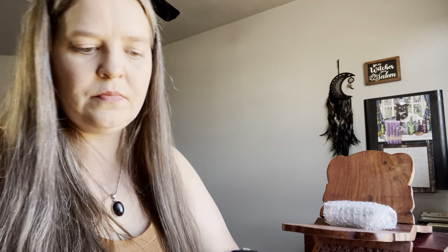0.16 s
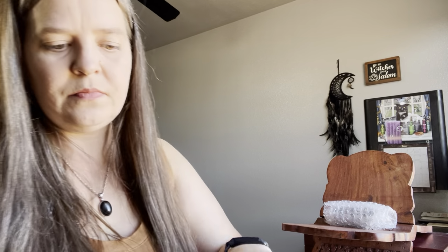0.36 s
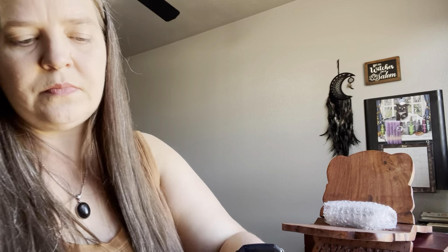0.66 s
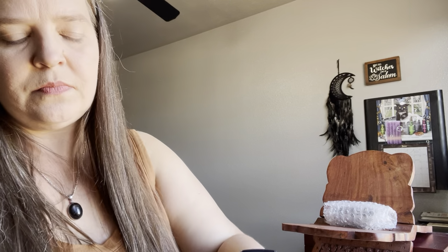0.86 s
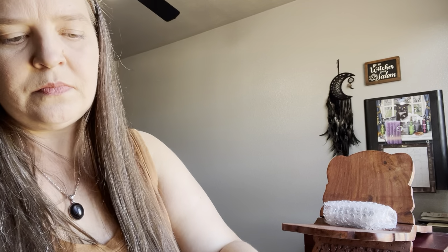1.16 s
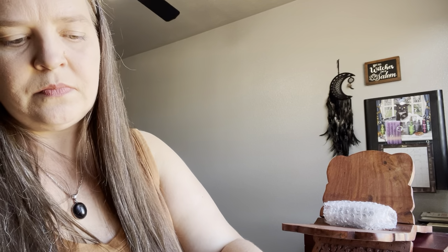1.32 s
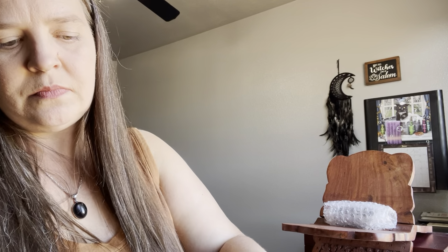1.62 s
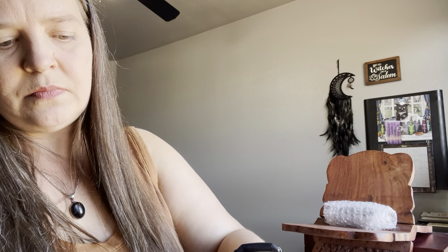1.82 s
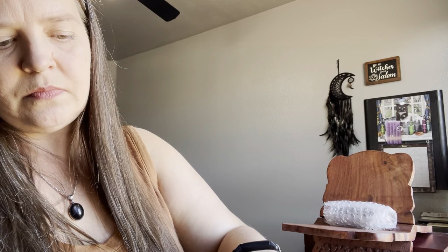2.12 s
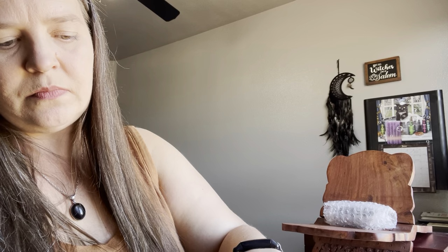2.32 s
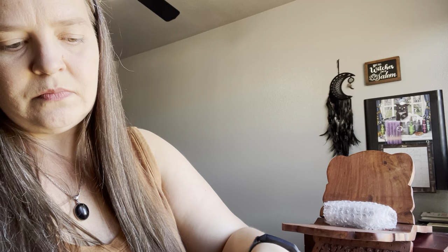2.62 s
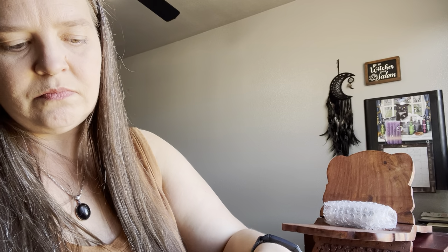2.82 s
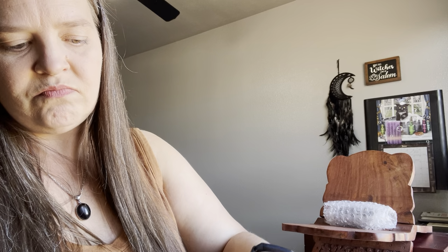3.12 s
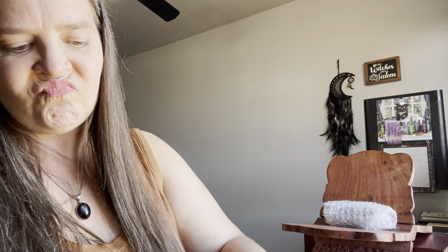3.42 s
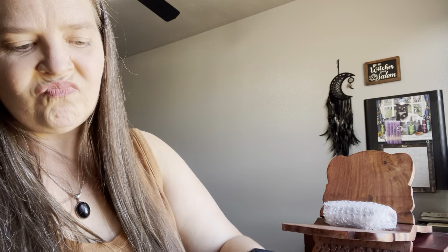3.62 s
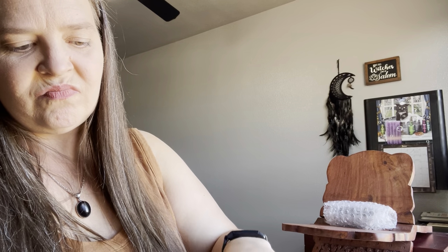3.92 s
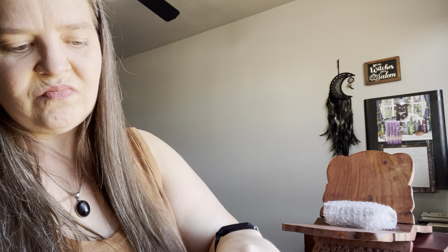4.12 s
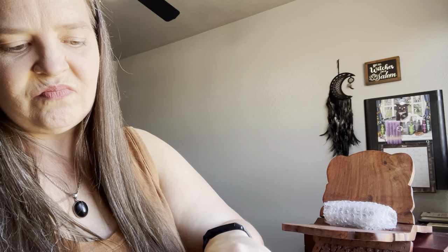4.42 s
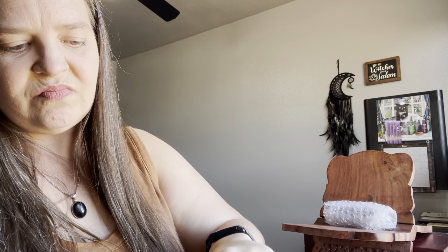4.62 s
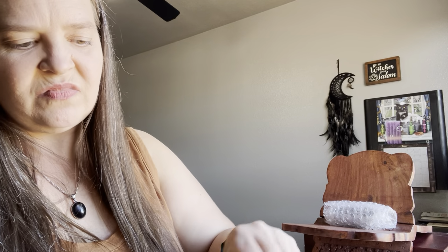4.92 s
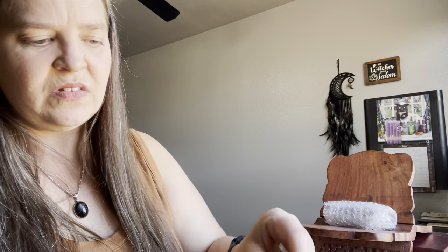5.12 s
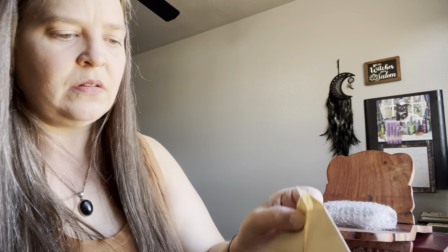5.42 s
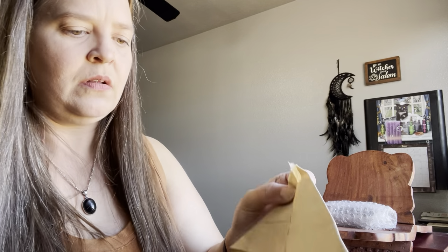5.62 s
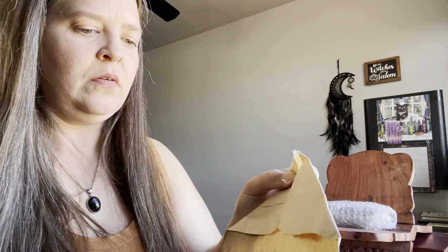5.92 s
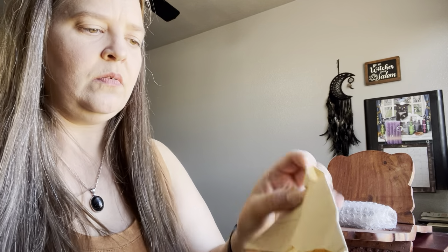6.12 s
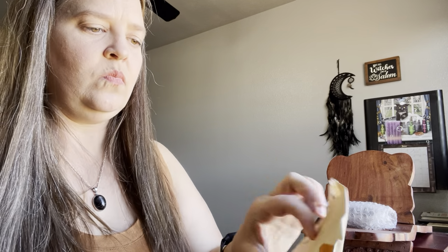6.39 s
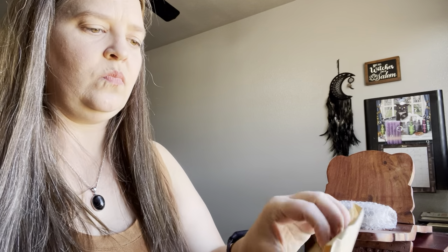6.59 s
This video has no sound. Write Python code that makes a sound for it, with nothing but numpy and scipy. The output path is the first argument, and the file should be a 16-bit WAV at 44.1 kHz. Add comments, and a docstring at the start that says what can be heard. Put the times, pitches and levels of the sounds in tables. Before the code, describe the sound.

Stiff brown paper is handled and unfolded close by in a quiet room, rustling softly, crackling irregularly and snapping sharply at the creases.

```python
"""Thick brown paper is unfolded by hand: buckling facets crinkle over the rustle of broad panels.
Level curves for holding, sliding and bending shape filtered grains and hiss; rubbing sounds hollow resonances.
Creases snap as filtered noise bursts, dents ring briefly with sinking pitch, and panels flap with a soft thud.
Sparse decaying reflections and a steady low hush form the room, heard at two close microphone ports."""
import sys
import numpy as np
from scipy import signal
from scipy.fft import rfft, irfft, next_fast_len
from scipy.io import wavfile
from scipy.ndimage import uniform_filter1d

SR = 44100
rng = np.random.default_rng(int(sys.argv[2]) if len(sys.argv) > 2 else 0)


def digitize_waveform(pressure):
    """Quantize a signal to 16-bit integers and store it at the path in sys.argv[1].

    Rows of a 2-D input are taken as channels; values are limited to [-1, 1].
    """
    field = np.atleast_2d(pressure).T
    bounded = np.clip(field, -1, 1)
    quanta = np.round(bounded * 32767).astype(np.int16)
    wavfile.write(sys.argv[1], SR, quanta)


N = 297875
TIME = np.arange(N) / SR
EDGE_HZ = 16200  # upper band limit


def amp(db):
    """Level law: decibels become an amplitude gain."""
    return 10 ** (np.asarray(db) / 20)


def unit(x):
    """Normalisation: the signal is scaled to an rms of 1."""
    return x / np.sqrt(np.mean(x ** 2) + 1e-20)


def read(points, hz):
    """Interpolation: a table is read along a logarithmic frequency axis."""
    f, value = np.transpose(points)
    return np.interp(np.log(hz + 1), np.log(f), value)


def add(mix, s, sound):
    """Superposition: a two-channel sound is added at time s."""
    part = mix[:, max(round(s * SR), 0):][:, :sound.shape[1]]
    part += sound[:, :part.shape[1]]


def colour(x, points):
    """Minimum phase: a causal filter takes the given spectrum and keeps attacks sharp."""
    log_gain = np.log(amp(read(points, abs(np.fft.fftfreq(4096, 1 / SR)))))
    spectrum = np.exp(np.conj(signal.hilbert(log_gain)))
    taps = np.fft.ifft(spectrum).real[:2048]
    return signal.oaconvolve(x, taps[None], axes=1)[:, :N]


def band(x, low_hz, high_hz, order=2):
    """Band limitation: a causal band-pass keeps one frequency range."""
    edges = [low_hz, min(high_hz, SR / 2 - 1)]
    return signal.sosfilt(signal.butter(order, edges, "band", fs=SR, output="sos"), x)


def facet(x, hz, q):
    """Resonance: one stiff facet of paper rings briefly when driven."""
    return signal.lfilter(*signal.iirpeak(min(hz, SR / 3), max(q, 1), fs=SR), x)


# spectrum of the room's hush: frequency_hz [Hz], gain_db [dB]
HUSH_SPECTRUM = [(18, -36), (35, -31), (60, 17), (85, 1), (130, 0.5), (350, -33), (1000, -26), (2000, -45),
                 (16000, -32)]


def room_tone(level_db=-62):
    """Stationary noise: spectrally shaped noise gives the low, steady hush of the room."""
    return amp(level_db) * unit(colour(rng.standard_normal((2, N)), HUSH_SPECTRUM))


SWELL_SHAPE = 0.49  # power of the half sine that a slide follows
# the sheet merely held in the fingers; levels before the layer trims in sheet():
# time_s [s], rustle_db [dB], crinkle_db [dB]
HELD_LEVELS = [(0, -57.5, -64.5), (1.0, -64, -63), (1.3, -65, -64.5), (4.8, -49, -61), (5.1, -51, -46.5),
               (6.2, -56.5, -52), (6.75, -46, -46)]
# paper slides over paper in one soft swell; levels before the same trims:
# start_s [s], length_s [s], rustle_db [dB], crinkle_db [dB], smoothness [0-1]
SLIDE_EVENTS = [(0.163, 0.18, -46, -48, 0.33), (0.527, 0.1, -43.5, -64, 0.85),
                (1.038, 0.49, -44, -53.5, 0.56), (1.134, 0.12, -48, -47.5, 1),
                (1.594, 0.22, -49.5, -76, 0.4), (1.807, 0.2, -44, -56, 0.37),
                (2.008, 0.49, -42, -45.5, 0.29), (2.494, 0.34, -41.5, -48, 0), (2.904, 0.22, -48, -49, 0),
                (3.098, 0.31, -37, -38.5, 0.07), (3.45, 0.4, -42.5, -50.5, 0.05),
                (3.966, 0.43, -40.5, -45, 0.19), (4.37, 0.28, -44, -46.5, 0),
                (5.631, 0.16, -42.5, -44.5, 0.04), (6.518, 0.18, -44.5, -48, 0.14)]


def sliding():
    """Friction power: rustle, crinkle and smooth rubbing swell and fade with the speed of the hand."""
    s, rustle_db, crinkle_db = np.transpose(HELD_LEVELS)
    held_rustle = amp(np.interp(TIME, s, rustle_db))
    held_crinkle = amp(np.interp(TIME, s, crinkle_db))
    power = np.array([held_rustle, held_crinkle, np.zeros(N)]) ** 2
    for s, length, rustle_db, crinkle_db, smooth in SLIDE_EVENTS:
        speed = abs(np.sin(np.pi * TIME[TIME < length] / length)) ** SWELL_SHAPE
        levels = [amp(rustle_db), amp(crinkle_db), smooth * amp(rustle_db)]
        add(power, s, np.outer(levels, speed) ** 2)
    return power


# linear attack time and release time constant of a bend
BEND_ATTACK_S, BEND_RELEASE_S = 0.0092, 0.0099
# the sheet then settles more softly: levels relative to the bend, and their rate of fall
SETTLE_RUSTLE_DB, SETTLE_CRINKLE_DB, SETTLE_DB_PER_S = -14.5, -18, 105
# the hands bend or pull the sheet; levels before the layer trims in sheet():
# start_s [s], length_s [s], rustle_db of the panels [dB], crinkle_db of the small creases [dB]
BEND_EVENTS = [(0.126, 0.054, -32.5, -44), (0.457, 0.028, -34, -38), (0.557, 0.052, -40, -43),
               (0.686, 0.063, -33.5, -41), (1.479, 0.035, -33.5, -42), (1.558, 0.014, -37, -33),
               (1.908, 0.065, -43, -41.5), (2.076, 0.034, -37, -42), (2.21, 0.046, -37, -37.5),
               (2.434, 0.071, -36.5, -39.5), (2.597, 0.023, -33.5, -36.5), (2.845, 0.027, -39.5, -45.5),
               (3.284, 0.048, -24, -25), (3.322, 0.0486, -25.5, -26.5), (3.799, 0.036, -42, -39.5),
               (4.208, 0.035, -43, -39.5), (4.341, 0.06, -39, -40.5), (4.58, 0.038, -41, -38.5),
               (4.661, 0.081, -33.5, -39.5), (4.849, 0.0097, -30.5, -37.5), (5.125, 0.024, -34.5, -41),
               (5.162, 0.044, -34, -31.5), (5.237, 0.22, -37, -39), (5.457, 0.042, -40.5, -35),
               (5.779, 0.053, -41.5, -41), (5.866, 0.035, -51, -38), (6.012, 0.056, -41, -41),
               (6.319, 0.029, -42, -33.5), (6.476, 0.054, -41, -43)]


def bending():
    """Bending power: rustle and crinkle build quickly, hold, release quickly and settle slowly."""
    power, t = np.zeros((2, N)), TIME[:SR * 2 // 3]
    settle = amp([[SETTLE_RUSTLE_DB], [SETTLE_CRINKLE_DB]])
    attack = np.minimum(t / BEND_ATTACK_S, 1)
    for s, length, rustle_db, crinkle_db in BEND_EVENTS:
        after = np.maximum(t - length, 0)
        settling = settle * amp(-SETTLE_DB_PER_S * after)
        release = (1 - settle) * np.exp(-after / BEND_RELEASE_S) + settling
        add(power, s, (amp([[rustle_db], [crinkle_db]]) * attack * release) ** 2)
    return power


RUN_S = 0.025  # spacing of the random points that set how busy a facet is


def grains(per_s, spread_db, low_hz, high_hz, decay_s, ring, q, hiss, count=24):
    """Granular excitation: unequal buckles ring many facets, over a hiss of those too fine to tell apart."""
    out = np.zeros((2, N))
    t = TIME[:768]
    for hz in np.geomspace(low_hz, high_hz, count):
        # each facet buckles in short runs, so the colour keeps changing
        busy = unit(np.interp(TIME / RUN_S, np.arange(N), rng.standard_normal(N))) ** 2
        struck = rng.random(N) < busy * per_s / count / SR
        clicks = struck * amp(spread_db * np.minimum(rng.exponential(1, N), 4))
        burst = rng.standard_normal((2, len(t))) * np.exp(-t / decay_s)
        burst = burst + ring * facet(burst, hz, q)
        out += signal.oaconvolve(clicks[None], burst, axes=1)[:, :N]
    return unit(out) + hiss * rng.standard_normal((2, N))


def worked(x, level, size=1800):
    """Power sharing: the power the hands put in is divided among the grains of each moment."""
    power = uniform_filter1d(uniform_filter1d((x ** 2).mean(0), size), size)
    return x / np.sqrt(abs(power) + 1e-12) * level


# resonances of the hollow under a sliding layer; each filter is applied twice:
# pitch_hz [Hz], sharpness Q of one pass [-], level_db before flutter, re the smooth part of the rustle [dB]
HOLLOW_MODES = [(453, 2.9, -4.5), (2170, 8.9, -13), (4140, 6.9, -16.5)]


def hollow(drift=0.0426, flutter_db=3):
    """Cavity resonance: rubbing sounds the hollow between layers, whose modes drift and swell with the gap."""
    rub, out, at = rng.standard_normal((2, N)), np.zeros((2, N)), np.arange(N)
    for hz, q, db in HOLLOW_MODES:
        gap = unit(band(rng.standard_normal(N), 2.06, 21.3))
        # reading the ring at a varying speed shifts its pitch
        moved = at + drift * np.cumsum(gap)
        ring = np.array([np.interp(moved, at, side) for side in facet(facet(rub, hz, q), hz, q)])
        out += amp(db) * unit(ring * amp(flutter_db * gap))
    return out


WAVER_DB, WAVER_HZ = 1.88, 44.4  # rms of the uneven grip, and the upper edge of its band


def waver():
    """Stick-slip: a random gain follows the paper catching and letting go under the fingers."""
    return amp(WAVER_DB * unit(band(rng.standard_normal(N), WAVER_HZ / 4, WAVER_HZ)))


SMOOTH_HISS = 2.8  # weight of the smooth slide's hiss relative to the grains
# spectra of the two layers: frequency_hz [Hz], gain_db [dB]
RUSTLE_SPECTRUM = [(40, -56), (110, -2), (230, -6.5), (330, -1.5), (450, 2.5), (620, -3.5), (950, 0.5),
                   (1350, -7.5), (1700, -12), (2600, -13.5), (6000, -72.5)]
CRINKLE_SPECTRUM = [(700, -51), (1300, -35.5), (1900, 3), (2700, -2), (3700, 0.5), (5200, -5.5),
                    (7800, -1.5), (10000, -5), (13000, -6.5), (16000, -7.5)]


def sheet(rustle_db=-4.0, crinkle_db=-1, taut_db=-23, merging_db=-19, still_db=-63, bend_hiss=0.62):
    """Size and pitch: broad panels rustle low while small creases crinkle high."""
    slid = sliding()
    rustle_level, crinkle_level = np.sqrt(bending() + slid[:2])
    rub_level = np.sqrt(slid[2])
    # sliding is smoother than bending
    hiss = bend_hiss + SMOOTH_HISS * rub_level / rustle_level
    # under a hard pull the buckles come so fast that they merge into a rush
    hiss = hiss + crinkle_level / amp(merging_db)
    # a sheet that is nearly still only rubs and hardly buckles
    hiss = hiss + amp(still_db) / crinkle_level
    rustle = grains(per_s=300, spread_db=3.0, low_hz=300.0, high_hz=1440,
                    decay_s=0.0023, ring=3.9, q=6.3, hiss=hiss + .5)
    rustle = colour(rustle, RUSTLE_SPECTRUM)
    crinkle = grains(per_s=280, spread_db=5.5, low_hz=1520, high_hz=14500,
                     decay_s=0.0012, ring=5.0, q=5.0, hiss=hiss)
    crinkle = colour(crinkle, CRINKLE_SPECTRUM)
    # a taut sheet sounds higher in both
    taut = rustle_level / amp(taut_db)
    rustle = rustle + taut * band(rustle, 800, 1300, order=1)
    crinkle = crinkle + .5 * taut * band(crinkle, 5500, EDGE_HZ, order=1)
    grainy = worked(rustle, rustle_level * amp(rustle_db))
    grainy = grainy + worked(crinkle, crinkle_level * amp(crinkle_db))
    return waver() * (grainy + rub_level * hollow())


def ringing(turns):
    """Phase quadrature: a pure vibration differs by a quarter cycle between the two channels."""
    angle = 2 * np.pi * turns
    return np.array([np.sin(angle), rng.choice([-1, 1]) * np.cos(angle)])


# ratio of starting to settled pitch, and time constant of the fall
FLAP_GLIDE, FLAP_GLIDE_S = 3.6, 0.008
# a whole panel flaps or bumps the table; level before the swing envelope, pitch on which it settles:
# start_s [s], level_db [dB], pitch_hz [Hz]
FLAP_EVENTS = [(0.136, -35.5, 95), (0.585, -31.5, 136.6), (0.756, -28, 148.7), (1.483, -28, 120),
               (4.687, -30, 104), (4.753, -31, 107), (4.855, -28, 106.4), (5.166, -33, 150.6),
               (5.204, -29.5, 121), (5.405, -25, 106.5), (6.032, -32.5, 128), (6.339, -33, 155.5),
               (6.502, -29, 136), (6.723, -38, 131)]


def flaps(rise_s=0.004, decay_s=0.016, flutter=0.3):
    """Dispersion: a panel pushes air and sways; short bending waves arrive first, so the pitch falls."""
    out, t = np.zeros((2, N)), TIME[:SR // 4]
    swing = (1 - np.exp(-t / rise_s)) * np.exp(-t / decay_s)
    for s, db, hz in FLAP_EVENTS:
        pitch = hz * (1 + (FLAP_GLIDE - 1) * np.exp(-t / FLAP_GLIDE_S))
        turns = np.cumsum(pitch) / SR
        air = unit(band(rng.standard_normal((2, len(t))), hz * .5, hz * FLAP_GLIDE))
        add(out, s, amp(db) * (ringing(turns) + flutter * air) * swing)
    return out


def buckle(decay_s, low_hz, high_hz, facet_hz, ring, q, scatter=0.084, scatter_s=0.0099,
           rise_s=0.00057, uneven_db=2, click=4):
    """Impulsive excitation: a burst of fibre slips rings a facet; nearby folds scatter it for a moment."""
    t = TIME[:2048]
    force = (1 - np.exp(-t / rise_s)) * (np.exp(-t / decay_s) + scatter * np.exp(-t / scatter_s))
    # the crease gives way in jerks, each a fraction of a millisecond long
    jerks = amp(uneven_db * unit(uniform_filter1d(rng.standard_normal(len(t)), size=20)))
    slips = rng.standard_normal((2, len(t))) * force * jerks
    # it flips over in one sharp click, 1 ms in
    slips[:, 44] += click * rng.choice([-1, 1], size=2)
    other_hz = low_hz * (high_hz / low_hz) ** rng.random()
    # the main facet rings clearly; outside its range a neighbour answers more weakly
    if low_hz < facet_hz < high_hz:
        tone = facet(slips, facet_hz, q)
    else:
        tone = .5 * facet(slips, other_hz, q)
    sound = band(slips + ring * tone, low_hz, high_hz, order=3)
    attack = sound[:, :353]  # the first 8 ms set the level
    return sound / np.sqrt(np.mean(attack ** 2, 1, keepdims=True))


# a shallow dent pops through; level of its ring over 8 ms, pitch midway through its sag:
# start_s [s], level_db [dB], pitch_hz [Hz]
DENT_EVENTS = [(0.1617, -34, 1010), (0.585, -31.5, 930), (0.6949, -35, 900), (0.7189, -39, 524),
               (0.737, -33, 430), (0.747, -34, 420), (1.4812, -32.5, 590), (1.4935, -34, 442),
               (1.5552, -35, 480), (1.6438, -36.5, 980), (2.2398, -39.5, 1356), (2.6806, -29, 960),
               (2.9777, -46, 520), (3.1675, -50, 1485), (3.199, -28.5, 960), (3.2116, -20, 920),
               (3.219, -29, 1040), (3.265, -25, 930), (3.2955, -29.5, 513), (3.512, -41, 1100),
               (3.711, -44, 650), (3.7475, -37, 1110), (3.9708, -39, 410), (4.033, -36, 1220),
               (4.15, -45, 990), (4.2264, -36.5, 730), (4.377, -36, 1050), (4.397, -35, 960),
               (4.501, -41, 634), (4.689, -29.5, 790), (4.8087, -36, 484), (5.2495, -35, 695),
               (5.38, -35.5, 395), (5.451, -39, 1335), (5.7299, -37, 689), (6.467, -38.5, 1270)]


def dents(rise_cycles=0.28, decay_cycles=2.14, sag=0.29, crackle_db=-10):
    """Snap-through: a dent swings for a few cycles, sinking in pitch as it relaxes; its rim crackles faintly."""
    out, t = np.zeros((2, N)), TIME[:2048]
    for s, db, hz in DENT_EVENTS:
        cycles = hz * t
        fade = np.exp(-cycles / decay_cycles)
        swing = (1 - np.exp(-cycles / rise_cycles)) * fade
        turns = np.cumsum(hz * (1 + sag * (fade - .5))) / SR
        ring = ringing(turns) * swing / np.sqrt(np.mean(swing[:353] ** 2) / 2)
        rim = buckle(0.0038, 360, 16000, hz, ring=1.1, q=1.6)
        add(out, s, amp(db) * (ring + amp(crackle_db) * rim))
    return out


# base decay at 1 kHz and the usual crack level, before each band's factor in snaps()
SNAP_DECAY_S, USUAL_CRACK_DB = 0.0056, -34.5
# fraction by which it shortens per octave of pitch and per dB of crack
SNAP_SHORTER_PER_OCTAVE, SNAP_SHORTER_PER_DB = 0.028, .02
# the creases that snap loudest; pop and fizz are relative to the crack, before the trims in snaps():
# start_s [s], level_db of the crack [dB], pop_db of the panel [dB], fizz_db [dB], pitch_hz of the facet [Hz]
SNAP_EVENTS = [(0.228, -42.5, 5.5, -1, 910), (0.292, -42.5, 4, 0.5, 1630), (0.475, -35.5, 1.5, -5, 880),
               (0.7575, -38.5, 8.5, 4, 590), (1.436, -49.5, -8, -4, 2100), (1.4682, -20.5, -6.5, -5, 3870),
               (1.5344, -27.5, 0, -6.5, 2130), (1.5425, -34.5, 4, -2, 2050),
               (1.5679, -27.5, -1.5, 5.5, 1350), (1.9463, -36.5, 2, -9, 5900),
               (2.0858, -34.5, 4.5, -6, 1643), (2.1705, -45.5, 9.5, 2, 1270), (2.206, -36.5, 2.5, 0, 1070),
               (2.2138, -43.5, 8, 2, 6060), (2.251, -36, 1, -4, 5050), (2.2634, -27, 2, -3.5, 786),
               (2.3185, -27.5, 1, -3.5, 3200), (2.476, -31, 4.5, 0.5, 880), (2.4856, -41.5, 7, 6, 990),
               (2.5422, -36, 1, -3.5, 1030), (2.6085, -39.5, 12, 6, 860), (2.656, -39.5, 12, 6.5, 830),
               (2.839, -45.5, 6, 3, 645), (2.985, -35.5, -7.5, -6.5, 4670), (3.117, -47.5, -3, 9, 5110),
               (3.1408, -32.5, 4.5, 5.5, 890), (3.1787, -34.5, 2, -17, 2370), (3.2465, -35, -8, -2, 1970),
               (3.2565, -32, 7, -4.5, 930), (3.2781, -29, 3, -4, 4400), (3.3053, -25.5, 3, 0, 1770),
               (3.332, -30.5, 1, 5, 1200), (3.3458, -28, -2, -2, 950), (3.355, -32, 4, 4, 990),
               (3.367, -33, 9.5, 0, 1140), (3.3737, -36, 8.5, 6, 1290), (3.379, -32, 3.5, -4, 6300),
               (3.521, -39.5, 7, -16, 1160), (3.5375, -30.5, -7, -3.5, 5900), (3.5746, -36, 6.5, -24, 590),
               (3.6095, -30.5, -1.5, -2.5, 3370), (3.7823, -36.5, 2.5, -18, 2340),
               (3.8279, -35, -25, -14, 4050), (3.862, -45.5, 1, 10, 6820), (4.341, -39.5, -4, -3, 910),
               (4.358, -31, -14, -7, 2700), (4.4323, -36, -3.5, -15, 2230), (4.515, -38, 2.5, 5, 2080),
               (4.5481, -34.5, 2, 3, 3800), (4.647, -48.5, 13, 10.5, 980), (4.725, -41, 2, -14, 2400),
               (4.7523, -33, -0.5, -6, 1900), (4.855, -36, 7.5, -8, 550), (4.936, -45, 5, -17, 1330),
               (5.0307, -28, -19, -10.5, 3740), (5.1415, -31.5, -9, -8, 4670), (5.167, -31, 1, -1, 3730),
               (5.1764, -31, -5, -14, 3660), (5.193, -32.5, 2.5, -9, 447), (5.2022, -29, -7, -6, 930),
               (5.2445, -30, -1.5, -4.5, 4100), (5.258, -33, 3, -9, 500), (5.272, -33, -21, -9, 3620),
               (5.288, -38, -2, -9, 473), (5.3152, -30.5, 0, -5, 2300), (5.3428, -29, -3.5, -4.5, 1110),
               (5.3727, -32.5, -3, -9, 5870), (5.4046, -30, 3.5, -3.5, 1320), (5.439, -37, 0, -3, 1340),
               (5.4705, -30, -0.5, -2, 795), (5.476, -26, -10, -4, 2250), (5.567, -26.5, -4.5, -10.5, 1525),
               (5.686, -37, -0.5, -2, 5950), (5.7616, -32.5, -6, -22, 2410),
               (5.7971, -39.5, -1.5, -17, 2800), (5.8105, -39, 1, -17, 4300), (5.874, -31, -1, 1, 4070),
               (5.9228, -33, -6, -10, 1620), (6.08, -34.5, -18, -8, 4500), (6.086, -36, -0.5, -1, 3220),
               (6.227, -41.5, 8, 2, 1700), (6.3234, -48.5, -9, 12.5, 6050), (6.3361, -35, 3, 0, 4460),
               (6.3581, -36.5, -5, -4, 6100), (6.507, -36.5, 5, -20, 1260), (6.594, -38.5, -20, -24, 6300),
               (6.676, -41.5, 2.5, -18, 2300), (6.7385, -38, -11, -6, 2500)]


def snaps(pop_trim_db=-1, fizz_trim_db=1, pop_decay=0.75, crack_decay=0.97, fizz_decay=0.49):
    """Sudden release: each crease gives a pop of its panel, a crack and a still shorter fizz."""
    out = np.zeros((2, N))
    for s, db, pop, fizz, hz in SNAP_EVENTS:
        # small high facets and hard cracks die away sooner
        decay = SNAP_DECAY_S * (1 - SNAP_SHORTER_PER_OCTAVE) ** np.log2(hz / 1000)
        decay *= (1 - SNAP_SHORTER_PER_DB) ** (db - USUAL_CRACK_DB)
        sound = buckle(decay * crack_decay, 1540, 7130, hz, ring=2.6, q=6.0)
        sound += amp(pop + pop_trim_db) * buckle(decay * pop_decay, 278, 1494, hz, ring=3.9, q=7.9)
        sound += amp(fizz + fizz_trim_db) * buckle(decay * fizz_decay, 6630, 14900, hz, ring=5.5, q=1.8)
        add(out, s, amp(db) * sound)
    return out


# reverberation time: frequency_hz [Hz], t60_s [s]
REVERB_TIME = [(150, 0.83), (400, 0.2), (1000, 0.42), (3000, 0.32), (8000, 0.5), (16000, 0.5)]
# reverberation level: frequency_hz [Hz], gain_db [dB]
REVERB_GAIN = [(100, 3), (500, -23), (1500, -5.5), (5000, -10), (15000, -17.5)]


def room(x, gap_s=0.003):
    """Reverberation: sparse reflections from table and walls die away, each band at its own speed."""
    t = TIME[:SR * 2 // 3]
    sparse = rng.random((2, len(t))) < .08
    taps = rng.standard_normal((2, len(t))) * sparse * (t > gap_s)
    hz, when, z = signal.stft(taps, SR, nperseg=256)
    t60 = read(REVERB_TIME, hz)[:, None]
    z *= amp(read(REVERB_GAIN, hz)[:, None] - 60 * when / t60)
    # equal energy for every decay time, apart from the gain
    z *= np.sqrt(np.log(1e6) / t60 / SR) / taps.std()
    echoes = signal.istft(z, SR, nperseg=256)[1]
    return signal.oaconvolve(x, echoes, axes=1)[:, :N]


# likeness of the two ports: frequency_hz [Hz], likeness [0-1]
PORT_LIKENESS = [(60, 1), (500, 0.53), (1500, 0.55), (5000, 0.013), (7000, 0.23), (9000, 0.98),
                 (16000, 0.78)]
# phase by which the left port leads: frequency_hz [Hz], phase_rad [radians]
PORT_LEAD = [(0, 0), (1000, -.8), (2900, -3.14), (5000, -5.2), (7000, -4.4), (8850, -3.14), (14400, 3.14),
             (17000, 5.9)]
# the right port is nearer the sheet: frequency_hz [Hz], right_minus_left_db [dB]
PORT_BALANCE = [(100, 4.5), (1200, 1.2), (4500, 2), (8000, 0)]


def ports(x):
    """Spatial coherence: two ports hear partly the same sound, a fraction of a millisecond apart."""
    size = next_fast_len(N + SR // 10)
    hz, (a, b) = np.fft.rfftfreq(size, 1 / SR), rfft(x, size)
    same = np.clip(read(PORT_LIKENESS, hz), 0, 1)
    lean = amp(read(PORT_BALANCE, hz) / 2)
    lag = np.exp(-1j * np.interp(hz, *np.transpose(PORT_LEAD)))
    right = (same * a + np.sqrt(1 - same ** 2) * b) * lag
    return irfft(np.array([a / lean, right * lean]), size)[:, :N]


def scene():
    """Superposition: the paper, its reflections and the still room add at the ports."""
    paper = sheet() + flaps() + dents() + snaps()
    return ports(paper + room(paper) + room_tone())


def record(dry):
    """Band limitation: a linear-phase low-pass removes the highest treble."""
    taps = signal.firwin(151, EDGE_HZ, window=("kaiser", 8), fs=SR)
    return signal.oaconvolve(dry, taps[None], "same", axes=1)


dry = scene()
out = record(dry)
digitize_waveform(out)
```